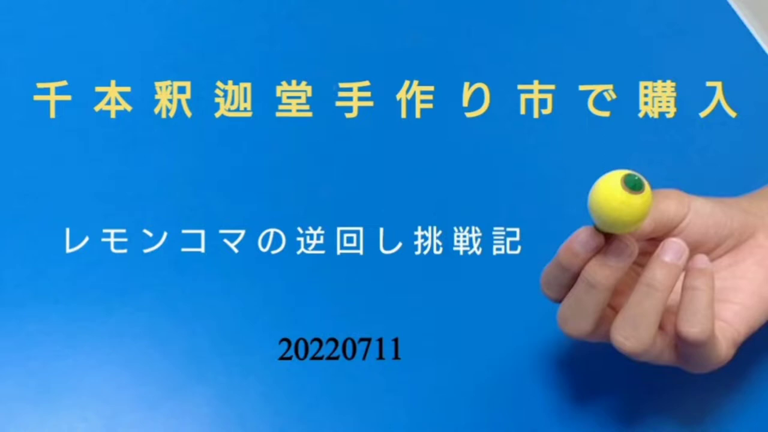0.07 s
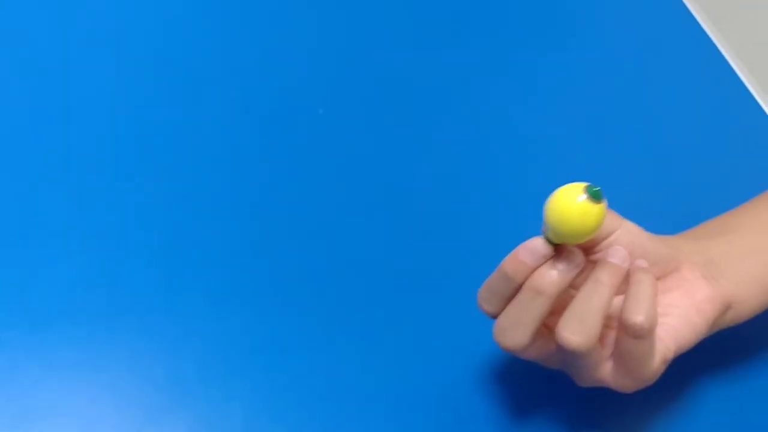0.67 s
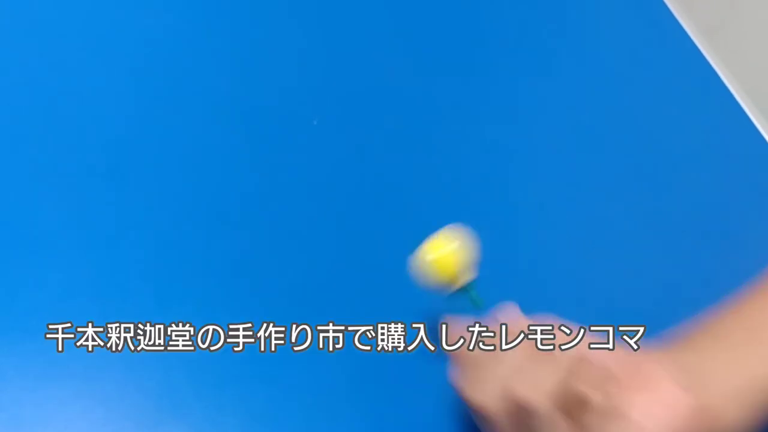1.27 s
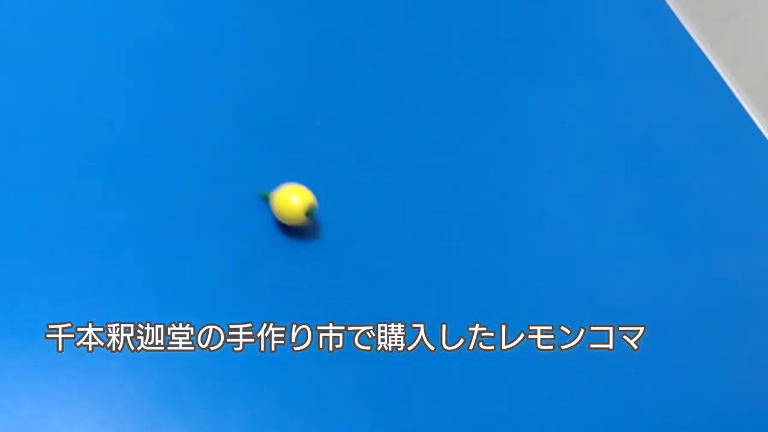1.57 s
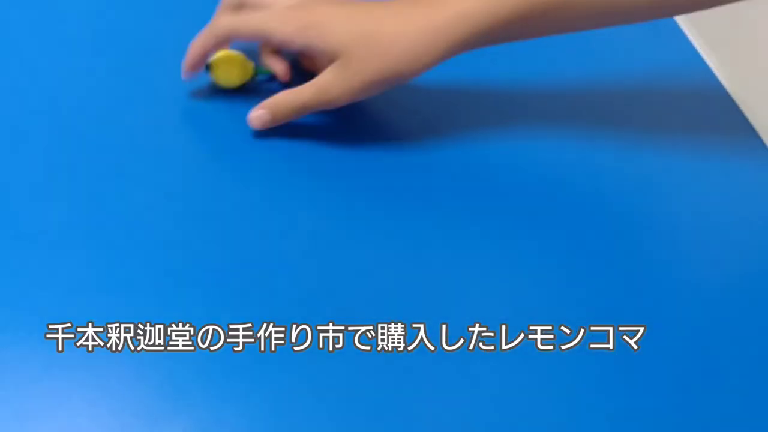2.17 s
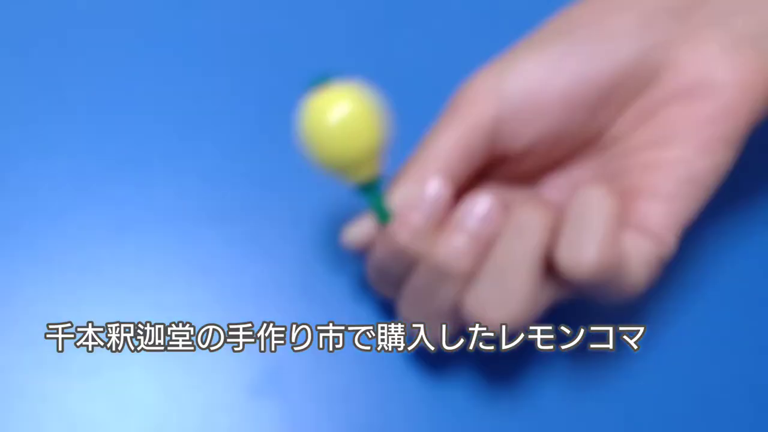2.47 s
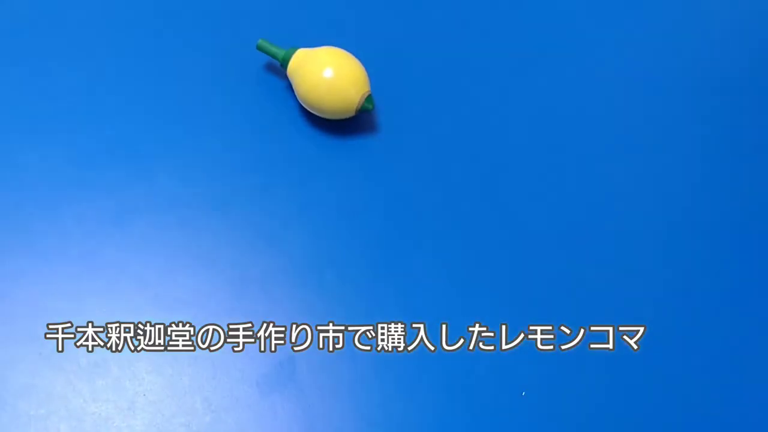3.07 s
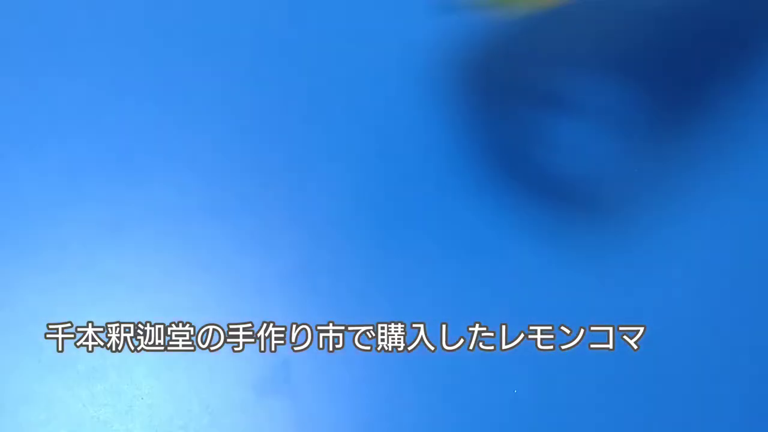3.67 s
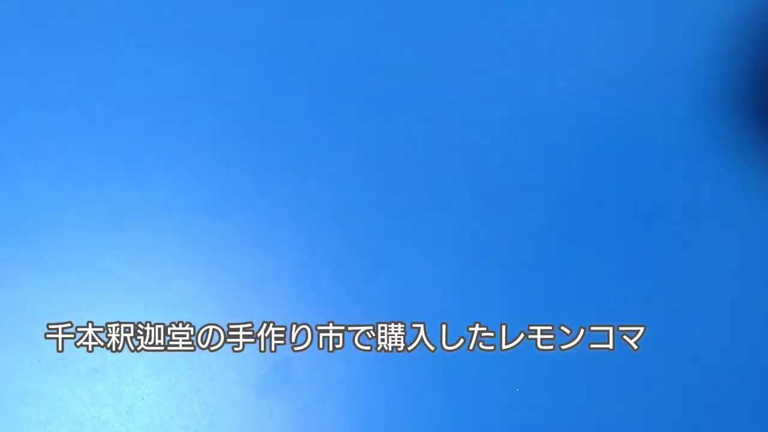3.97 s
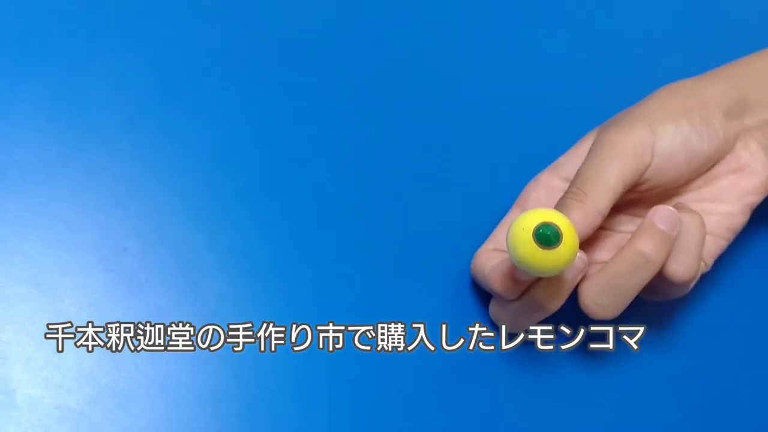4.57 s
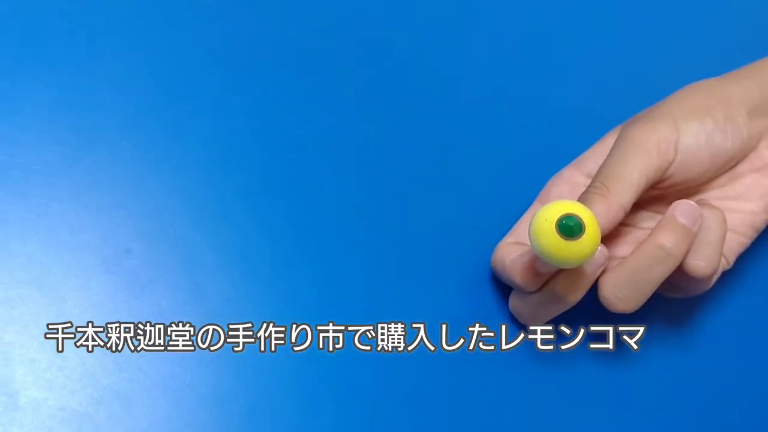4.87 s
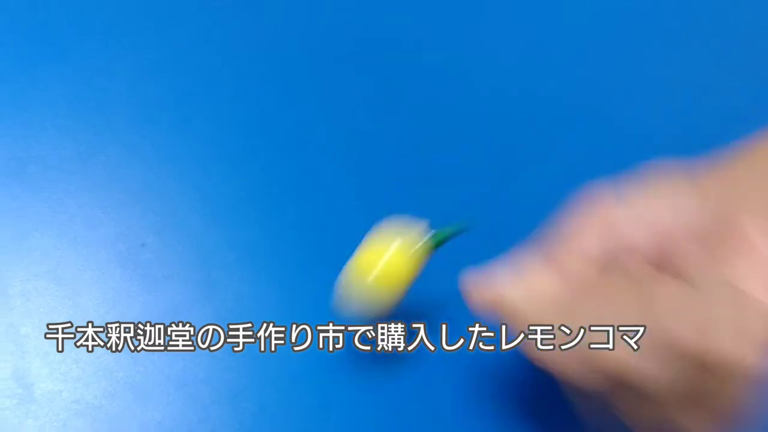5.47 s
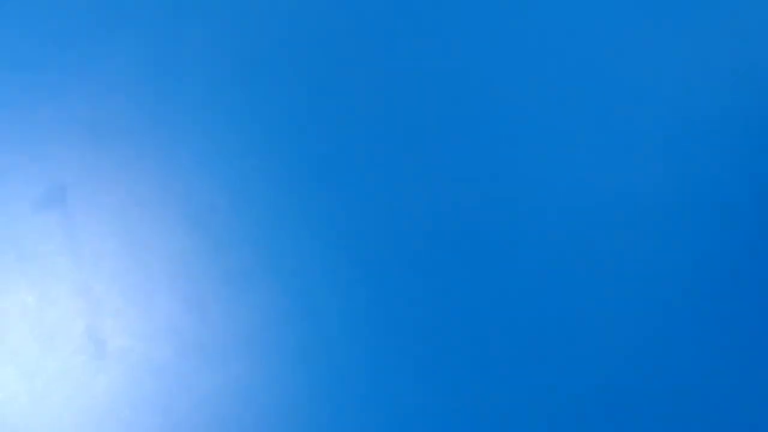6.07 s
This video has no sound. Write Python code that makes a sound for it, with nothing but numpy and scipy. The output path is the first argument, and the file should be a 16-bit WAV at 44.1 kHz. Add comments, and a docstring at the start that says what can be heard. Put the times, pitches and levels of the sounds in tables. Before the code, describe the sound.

Three runs of sharp knocks and short rattling rolls as a little wooden top is flicked across a tabletop, finally hitting the floor.

```python
"""In a quiet room, a small wooden top is flicked onto a laminated table. It bounces, rattles on its stem
and rolls; fingers catch it and tap it down; the last throw runs over the edge and hits the floor.
Each bounce is a sharp click followed by the ring of the board and the small room. Rolling is a patter
of tiny bumps in the lacquer, and skin sliding on the lacquer hisses softly.
The sound comes in three stretches with short silences between them."""
import sys
import numpy as np
from scipy import signal
from scipy.fft import rfft, irfft
from scipy.io import wavfile

SR = 44100
rng = np.random.default_rng(int(sys.argv[2]) if len(sys.argv) > 2 else 0)


def unload_audio(sound):
    """Save the sound as a 16-bit wav file, at the path given as the first command line argument."""
    columns = np.transpose(np.atleast_2d(sound))
    # keep every value between -1 and 1, then stretch to whole-number steps
    steps = np.round(np.clip(columns, -1, 1) * 32767)
    wavfile.write(sys.argv[1], SR, steps.astype(np.int16))


N = 279153
RING_SIZE = 20000  # samples given to one contact and its ring
TIME = np.arange(N) / SR
AGE = TIME[:RING_SIZE]  # seconds since a contact


def gain(db):
    """Turn decibels into a number to multiply by."""
    return 10 ** (np.asarray(db) / 20)


def unit(x):
    """Scale a sound to an average strength (rms) of 1."""
    return x / np.sqrt(np.mean(x ** 2) + 1e-18)


def lookup(points, hz):
    """Read between (frequency, value) points, with octaves evenly spaced."""
    at, value = np.transpose(points)
    return np.interp(np.log(np.maximum(hz, 1)), np.log(at), value)


def frequencies(size):
    """The frequencies in the spectrum of a sound this many samples long."""
    return np.fft.rfftfreq(size, 1 / SR)


def convolve(x, response):
    """Let every sample of x set off the response; x keeps its length."""
    return signal.fftconvolve(np.atleast_2d(x), np.atleast_2d(response), axes=-1)[:, :x.shape[-1]]


def colour(x, points):
    """Shape the tone along (frequency [Hz], level [dB]) points."""
    cepstrum = irfft(np.log(gain(lookup(points, frequencies(RING_SIZE)))))
    cepstrum[1:] *= 2 * (np.arange(1, RING_SIZE) < RING_SIZE // 2)  # so nothing rings before its cause
    return convolve(x, irfft(np.exp(rfft(cepstrum))))


def band(x, hz, octaves):
    """Keep only the frequencies around hz."""
    edges = np.minimum(hz * 2 ** (np.array([-.5, .5]) * octaves), [SR / 2 - 2, SR / 2 - 1])
    return signal.sosfilt(signal.butter(2, edges, "band", fs=SR, output="sos"), x)


def sides(db):
    """Left and right gains that make the left louder by db."""
    return gain(np.array([[.5], [-.5]]) * db)


def add(out, s, sound):
    """Mix a sound in at s seconds."""
    i = int(s * SR)
    out[:, i:i + sound.shape[-1]] += sound[:, :N - i]


# how alike left and right are in the room: (frequency [Hz], likeness [-1 opposite to 1 the same])
LIKENESS = [(60, 0.55), (280, 0.86), (640, 0.57), (1400, -0.36), (3100, 0.1), (6800, 0.47), (14000, 0.84)]
# which side the room's sound leans to: (frequency [Hz], left minus right [dB])
BALANCE = [(200, 1), (700, -0.5), (1300, -5), (2400, -8.5), (4400, -8), (8000, 1), (15000, -3.5)]
def diffuse(size):
    """Noise arriving from all around, partly alike on the left and right."""
    shared, opposed = rfft(rng.standard_normal((2, size)))
    hz = frequencies(size)
    alike = np.clip(lookup(LIKENESS, hz), -1, 1)
    pair = shared * np.sqrt(1 + alike) + np.array([[1], [-1]]) * opposed * np.sqrt(1 - alike)
    return unit(irfft(pair * sides(lookup(BALANCE, hz)), size))


# the tone of the room's noise: (frequency [Hz], level [dB])
AIR_TONE = [(25, -3), (50, -14), (110, -13), (200, -12), (270, -9.5), (335, 3), (550, 1), (870, 3.5),
            (1400, 0.5), (2250, -2.5), (2800, -10), (9000, -42.5), (11000, -46), (15500, -44.5)]
# the stretches of sound: (start [s], end [s], room noise [dB], extra hiss [dB], fade-in [s])
STRETCHES = [(0.271, 2.408, -53.5, 16, 0.097), (2.588, 4.31, -55.5, 17.5, 0.025),
             (4.476, 6.4, -56, 9, 0.097)]
def room_air():
    """Steady room noise, with more or less hiss in each stretch."""
    out = np.zeros((2, N))
    for start, end, db, hiss_db, _ in STRETCHES:
        noise = colour(colour(diffuse(N), AIR_TONE), [(2500, 0), (8000, hiss_db)])
        out += gain(db) * unit(noise) * (TIME > start) * (TIME < end)
    return out


# light touches: (time [s], level [dB], pitch [Hz], time to fade by 30 dB [s])
TOUCHES = [(3.392, -46.5, 3160, 0.0052), (3.41, -46, 880, 0.07), (3.417, -51, 2900, 0.02),
           (3.547, -35, 786, 0.073), (5.458, -48, 259, 0.051), (6.129, -43.5, 1580, 0.068),
           (6.294, -26, 3000, 0.0038)]
# skin sliding on lacquer: (middle [s], half length [s], level [dB], pitch [Hz], width [octaves])
RUBS = [(0.407, 0.55, -65, 3300, 0.13), (0.767, 0.29, -71.5, 7900, 0.36), (1.386, 0.13, -65.5, 8340, 0.85),
        (3.737, 0.1, -58, 7300, 0.9), (5.58, 0.24, -67.5, 7100, 0.6)]
def fingers(room_db=-24, room_s=0.086):
    """Finger, nail and stem make small dry taps; sliding skin hisses and squeaks."""
    out = np.zeros((2, N))
    for s, db, hz, fade_s in TOUCHES:
        fade = gain(-30 * AGE / fade_s) + gain(room_db) * np.exp(-AGE / room_s)
        add(out, s, gain(db) * fade * unit(band(diffuse(RING_SIZE), hz, octaves=1.33)))
    for s, half_s, db, hz, octaves in RUBS:
        swell = np.cos(np.pi / 2 * np.clip((TIME - s) / half_s, -1, 1)) ** 4
        out += gain(db) * swell * unit(band(rng.standard_normal((2, N)), hz, octaves))
    return out


# first echoes off the walls and ceiling: (delay [s], level [dB])
ECHOES = [(0.0154, -19.5), (0.0178, -11.5), (.030, -20.5)]
def with_echoes(x, scatter_s=0.00024):
    """Add the first echoes, which reach left and right at slightly different moments."""
    delays = np.array(ECHOES)[:, :1] + scatter_s * rng.standard_normal((len(ECHOES), 2))
    for pair, (_, db) in zip(delays, ECHOES):
        echo = [np.interp(AGE - delay, AGE, side, left=0) for delay, side in zip(pair, x)]
        x = x + gain(db) * np.array(echo)
    return x


def build_up(x, early_db=-4.0, arrival_s=0.011, spread_s=0.0011):
    """A ring starts softer: the room only joins in when the walls answer."""
    return x * gain(early_db * (1 - np.tanh((AGE - arrival_s) / spread_s)) / 2)


# how long board and room ring together: (frequency [Hz], time to fade by 60 dB [s])
RING_TIMES = [(200, 0.47), (530, 0.19), (1400, 0.35), (3700, 0.28), (9700, 0.21)]
def ring(tone):
    """Countless resonances blur into noise, and each range of pitch fades at its own speed."""
    spectrum = rfft(unit(colour(diffuse(RING_SIZE), tone)))
    centres, fades = np.transpose(RING_TIMES)
    out = np.zeros((2, RING_SIZE))
    for this_band, fade_s in zip(np.eye(len(centres)), fades):
        share = lookup(np.c_[centres, this_band], frequencies(RING_SIZE))
        out += irfft(spectrum * share) * gain(-60 * AGE / fade_s)
    return out


def notes(table, scatter_db=2.0, detune=0.0036, longest_s=0.23):
    """The clear notes of a struck object, a little different each time; longest_s caps their fade."""
    hz, db, fade_s = np.transpose(table)[:, :, None]
    hz = hz * (1 + detune * rng.standard_normal(hz.shape))
    strength = gain(db + scatter_db * rng.standard_normal(hz.shape))
    waves = strength * np.exp(2j * np.pi * hz * AGE) * gain(-60 * AGE / np.minimum(fade_s, longest_s))
    # low notes reach left and right nearly in step
    phase_gap = np.arccos(np.clip(lookup(LIKENESS, hz[:, 0]), -1, 1))
    phase = 2 * np.pi * rng.random(len(table)) - np.outer(np.arange(2), phase_gap)
    arrival = np.exp(1j * phase) * sides(lookup(BALANCE, hz[:, 0]))
    return (arrival @ waves).imag / np.sqrt(np.sum(strength ** 2) / 2)


# where the top is: (time [s], left minus right [dB], farness [0 middle of the board to 1 far side])
PATH = [(1.399, -0.5, 0.19), (2.402, 3.5, 0.42), (2.698, -0.5, 0.65), (3.552, 3, 1), (5.6, -7, 0.39),
        (5.9, 1.5, 0.86)]
def position(s):
    """The top's left and right gains and its farness at s seconds."""
    at, lean_db, far = np.transpose(PATH)
    return sides(np.interp(s, at, lean_db)), np.interp(s, at, far)


# notes of the board and top together:
# (pitch [Hz], level hit in the middle [dB], level hit at the far side [dB], 60 dB fade before the cap [s])
BOARD_NOTES = [(325.5, -18, -9.5, 0.14), (549.7, -8, -24.5, 0.32), (716, 2, -12.5, 0.24),
               (800, -8, 1.5, 0.19), (828, -16.5, -4.5, 0.29), (901, -3.5, 0.5, 0.24),
               (1043, -4.5, -16, 0.1), (1234, -14.5, -4, 0.21), (1163, -3.5, -1, 0.49),
               (1416, -7.5, -11.5, 0.15), (1657, 4, -6, 0.25), (1750, -5.5, -3.5, 0.75),
               (1844, 1.5, -7.5, 0.57), (2096, 6, -12, 0.28), (2186, 4, -8, 0.31), (2535, 1, -18, 0.28),
               (2550, 2.5, -14.5, 0.17), (2573, 3, -7, 0.57), (2960, 0, -14, .25), (4080, -1.5, -10, 0.068),
               (4330, 0, -14, 0.38), (4550, -12, -13, 0.59), (4300, -6.5, -8.5, 0.26),
               (5280, -20.5, 0, 0.064)]
def board_notes(far, far_boost_db=2):
    """The spot that is hit decides which notes ring; the far side sounds more hollow."""
    hz, middle_db, far_db, fade_s = np.transpose(BOARD_NOTES)
    db = middle_db + far * (far_db - middle_db)
    return gain(far * far_boost_db) * notes(np.c_[hz, db, fade_s])


# the tone of the table's blurred ring: (frequency [Hz], level [dB])
BOARD_TONE = [(80, -32.5), (230, -30.5), (330, -15.5), (550, -6.5), (750, -4), (1050, -6), (2100, 1),
              (3000, -4.5), (4000, -3), (5200, -4), (6300, -12), (8500, -14.5), (13000, -29),
              (16000, -45.5)]
def board_ring():
    """The board and the room ring on after a contact."""
    return ring(BOARD_TONE)


# the tone of the contact click: (frequency [Hz], level [dB])
CLICK_TONE = [(30, -47), (100, -24.5), (250, -8.5), (600, 8), (2000, 4), (4000, 6.5), (5200, 1.5),
              (6500, -1), (9000, -7), (15000, -22)]
def click(crack_db=-14, crack_s=.002, span_s=0.0015, right_lag_s=.00015):
    """One sharp push and a brief crack from the wooden body, heard first on the left."""
    pulse = np.zeros((2, RING_SIZE))
    pulse[0, 0] = pulse[1, int(right_lag_s * SR)] = -1
    crack = gain(crack_db) * diffuse(RING_SIZE) * np.exp(-AGE / crack_s)
    push = colour(pulse + crack, CLICK_TONE)
    return push / np.sqrt(np.sum(push ** 2) / (2 * span_s * SR))


def ping(contact_s=.002, room_db=-15, room_s=0.03):
    """The small hard top pings near the upper limit of hearing, and the room holds it briefly."""
    fade = np.exp(-AGE / contact_s) + gain(room_db) * np.exp(-AGE / room_s)
    return fade * unit(band(diffuse(RING_SIZE), hz=14700, octaves=.09))


# the tone of the rolling rumble: (frequency [Hz], level [dB])
RUMBLE_TONE = [(47, -43), (80, -17.5), (174, -31.5), (327, -3.5), (414, -6.5), (505, -3), (605, 0),
               (985, 0), (1120, -1), (2100, -4), (3250, -23.5), (4110, -44), (6000, -40), (7800, -64),
               (13200, -120)]
# the top skids on its tip or rolls on its belly; the row at 2.365 s is fingers grabbing and rubbing it: (start
# [s], length [s], level [dB], extra grit [dB])
ROLLS = [(1.515, 0.2, -40, 2.5), (1.72, 0.17, -34, -9), (1.93, 0.092, -35, -11), (2.06, 0.079, -43.5, -15),
         (2.18, 0.087, -38.5, -18), (2.297, 0.011, -35, -15), (2.365, 0.045, -50.5, -0.5),
         (2.805, 0.023, -34.5, -10), (5.79, 0.036, -38, -11), (5.86, 0.025, -33, -7.5),
         (5.98, 0.093, -43.5, -9), (6.241, 0.13, -49, 6)]
def rolling(bumps_per_s=900, scatter_db=3, rumble_db=-2, grit_db=-3, click_db=5, notes_db=-16):
    """Tiny bumps of the lacquer patter on the board; fast rolling is gritty, slow rolling rumbles."""
    speed_up_share, settle_s = 0.37, .3
    drag_db_per_s, settle_db_per_s = 2, 133
    grit_tone = [(1200, -22.0), (3500, -3.5), (5000, -2.0), (7000, 1.0), (13000, 10.5)]
    out = np.zeros((2, N))
    for start, run_s, db, extra_grit_db in ROLLS:
        t = TIME[:int((run_s + settle_s) * SR)]
        heights = rng.choice([-1, 1], N) * gain(scatter_db * np.minimum(rng.exponential(size=N), 5))
        # a lead-in of RING_SIZE samples lets the ring fill up and is then dropped
        bumps = (heights * (rng.random(N) < bumps_per_s / SR))[:RING_SIZE + len(t)]
        pan, far = position(start)
        body = gain(notes_db) * board_notes(far) + ring(RUMBLE_TONE)
        rumble = unit(band(convolve(bumps, body), hz=760, octaves=5.34)[:, RING_SIZE:])
        ticks = convolve(bumps, board_ring() + gain(click_db) * click())
        grit = unit(colour(ticks, grit_tone)[:, RING_SIZE:])
        slowing_db = -drag_db_per_s * t - settle_db_per_s * np.maximum(t - run_s, 0)
        grit *= gain(grit_db + extra_grit_db + 0.11 * slowing_db)  # grit fades faster than rumble
        pressure = gain(db + slowing_db) * np.minimum(t / (speed_up_share * run_s), 1)
        add(out, start, pan * pressure * (gain(rumble_db) * rumble + grit))
    return out


def over_the_edge(start_s=5.84, lip_s=6.07, off_s=6.141, hz=732, fall_octaves_per_s=32):
    """The rolling top gives a rough tone that fades, then sinks as it runs over the rounded edge."""
    start_db, fade_db_per_s, lip_db = -43, 51, -55
    roughness_hz, ramp_s = 55, 0.0048
    pitch = hz * 2 ** (-fall_octaves_per_s * np.maximum(TIME - lip_s, 0))
    tone = np.exp(2j * np.pi * np.cumsum(pitch) / SR)
    db = np.maximum(start_db - fade_db_per_s * np.maximum(TIME - start_s, 0), lip_db)
    contact = np.clip(np.minimum(TIME - start_s, off_s - TIME) / ramp_s, 0, 1)
    smoothing = signal.butter(2, roughness_hz, fs=SR, output="sos")
    wobble = unit(signal.sosfilt(smoothing, rng.standard_normal((2, N))))
    return (wobble[0] * tone.real + wobble[1] * tone.imag) * gain(db) * contact


# the tone of the floor's slap and ring: (frequency [Hz], level [dB])
FLOOR_TONE = [(47, -58), (80, -31), (271, -35.5), (422, -16), (493, -18.5), (858, -8.5), (1140, -16.5),
              (1740, -8), (1860, -12.5), (2180, -7), (2780, -18), (5900, -18.5), (7530, -16), (11500, -22),
              (16000, -37)]
# notes of the floor: (pitch [Hz], level [dB], 60 dB fade before the cap [s])
FLOOR_NOTES = [(701, 4.5, 0.11), (828, 6, 0.11), (1001, -4, 0.21), (1510, -13, 0.25), (1720, 7.5, 0.34),
               (2070, -8, 0.27), (2175, -6, 0.3), (2480, 0, 0.16)]
# the top lands on the floor: (time [s], level [dB])
FLOOR_HITS = [(6.1464, -14), (6.152, -24.5)]
def floor_hits(click_db=-4, slap_db=-1, slap_s=0.0055, ring_db=-6, notes_db=-9):
    """The falling top lands with a click and a bright slap, and the floor rings."""
    out = np.zeros((2, N))
    for s, db in FLOOR_HITS:
        slap = gain(slap_db) * unit(colour(diffuse(RING_SIZE), FLOOR_TONE)) * np.exp(-AGE / slap_s)
        tail = build_up(gain(ring_db) * ring(FLOOR_TONE) + gain(notes_db) * notes(FLOOR_NOTES))
        add(out, s, gain(db) * (gain(click_db) * click() + slap + tail))
    return out


# the top hits the table: (time [s], level [dB], hardness as treble [dB], weight as bass [dB])
BOUNCES = [(1.437, -13.5, 5, -1), (1.563, -16.5, -3.5, -2), (1.651, -16, -1, 0), (1.728, -19, -5, -1.5),
           (1.798, -27, -11, -0.5), (1.827, -24.5, -3, 4), (1.852, -28.5, -13.5, 1),
           (1.867, -23.5, -6.5, -13), (2.297, -44.5, -4, 5), (2.303, -39.5, -3.5, 3),
           (2.618, -22, 2.5, -4.5), (2.717, -26, -0.5, 3.5), (2.736, -24.5, -0.5, -1),
           (2.783, -23, -1.5, 3), (2.823, -31.5, -12.5, 2.5), (2.868, -34, -4.5, 4),
           (3.557, -21.5, -4.5, 2), (5.629, -23.5, -4, -0.5), (5.637, -16, 1.5, 1), (5.714, -20, 0.5, -3.5),
           (5.758, -17, 2.5, -2), (5.8, -28, 1, 1), (5.839, -28, 0.5, -2.5), (5.867, -28.5, 5.5, -3)]
def bounces(click_db=1.5, ring_db=-5, notes_db=-11, ping_db=-30):
    """The top strikes the table: its hard tip gives more treble, its round belly more bass."""
    out = np.zeros((2, N))
    for s, db, hardness_db, weight_db in BOUNCES:
        pan, far = position(s)
        drive_db = -.8 * hardness_db + 0.23 * weight_db  # soft or heavy blows bring out the notes
        body = build_up(gain(notes_db + drive_db) * board_notes(far) + gain(ring_db) * board_ring())
        body = colour(body, [(40, -21.5), (280, -0.5)])  # the ring of a blow carries little deep bass
        # at the far side the click is weaker and the ping stands out
        strike = gain(click_db - 3 * far) * with_echoes(click())
        high_ping = gain(ping_db + 4 * far) * ping()
        contact_tone = [(600, weight_db), (1500, 0), (4500, 0.012), (8000, hardness_db)]
        add(out, s, gain(db) * pan * (colour(strike + body, contact_tone) + high_ping))
    return out


def scene():
    """The top, the hand and the room together."""
    return bounces() + floor_hits() + rolling() + over_the_edge() + fingers() + room_air()


def record(dry, ceiling=.6, cut_s=0.0068, low_cut_hz=80, high_cut_hz=16000):
    """Round the sharpest peaks, trim bass and highest treble; each stretch fades in and stops sharply."""
    rounded = dry / (1 + (dry / ceiling) ** 4) ** (1 / 4)
    thinned = signal.sosfilt(signal.butter(2, low_cut_hz, "high", fs=SR, output="sos"), rounded)
    gate = np.zeros(N)
    for start, end, _, _, fade_s in STRETCHES:
        fade_in = (1 - np.exp(-np.maximum(TIME - start, 0) / fade_s)) ** 2
        gate += fade_in * np.clip((end - TIME) / cut_s, 0, 1)
    return signal.sosfilt(signal.ellip(10, .2, 80, high_cut_hz, fs=SR, output="sos"), thinned * gate)


dry = scene()
out = record(dry)
unload_audio(out)
```